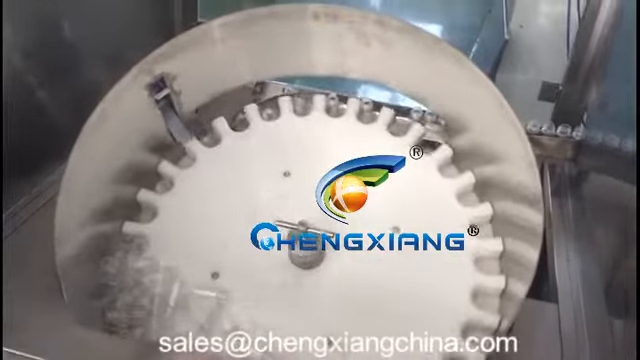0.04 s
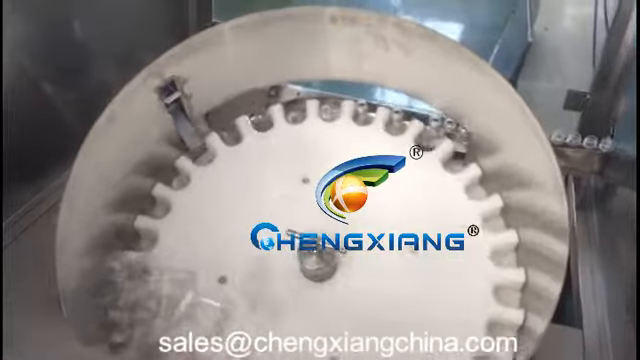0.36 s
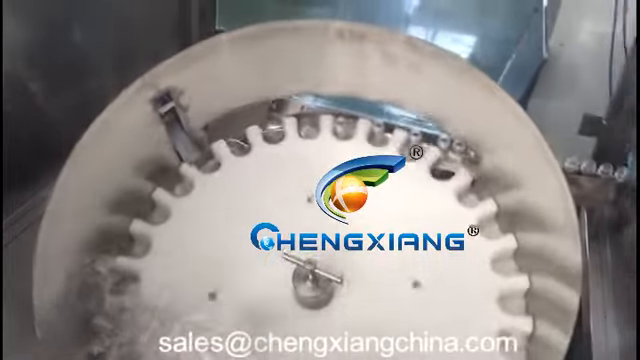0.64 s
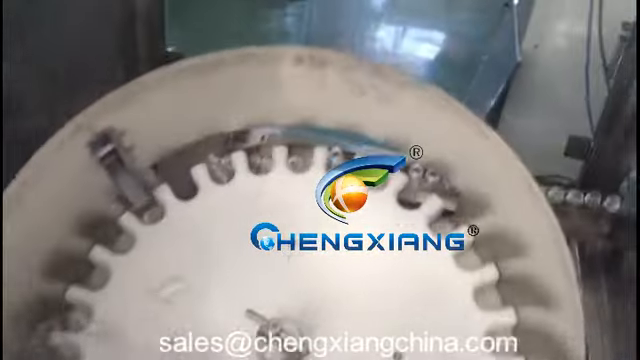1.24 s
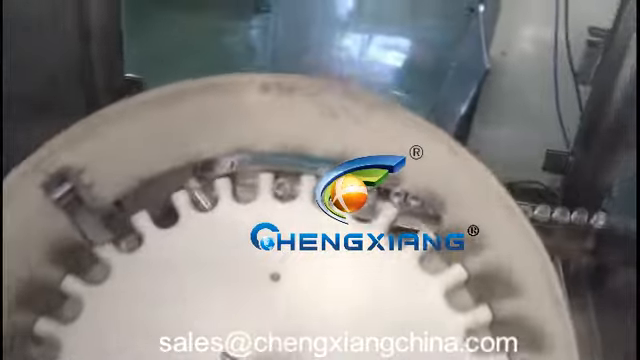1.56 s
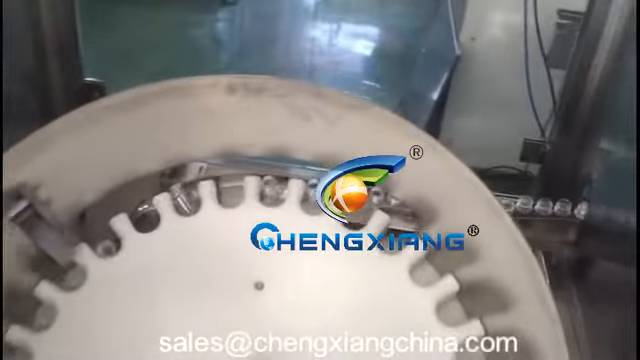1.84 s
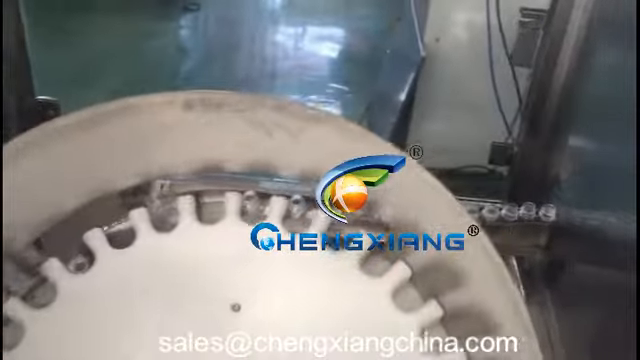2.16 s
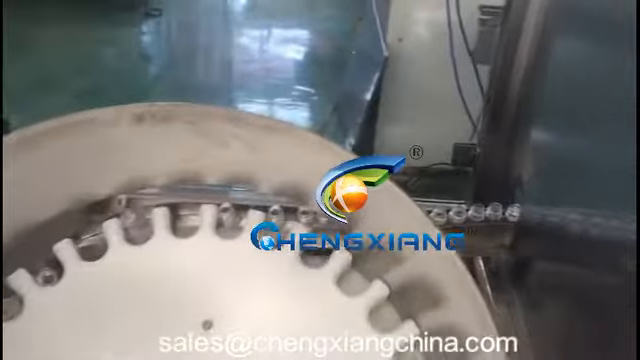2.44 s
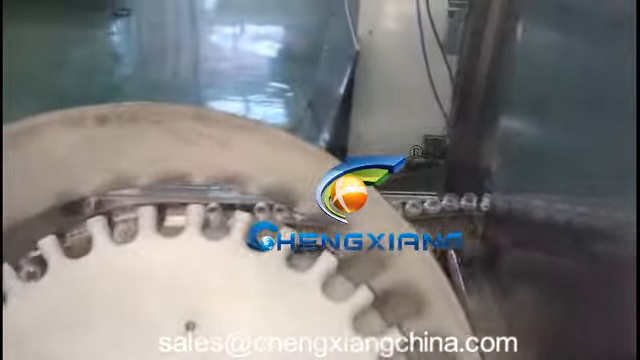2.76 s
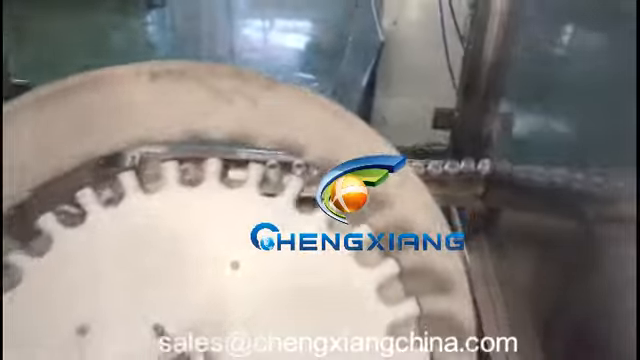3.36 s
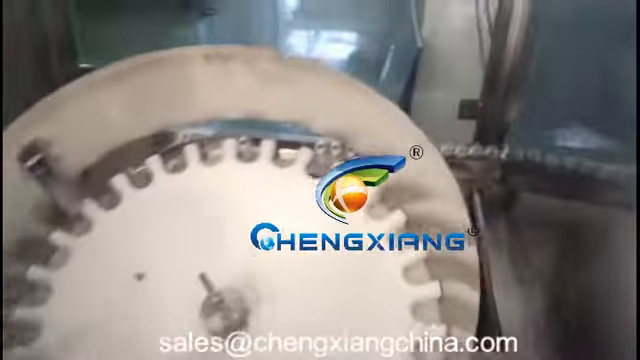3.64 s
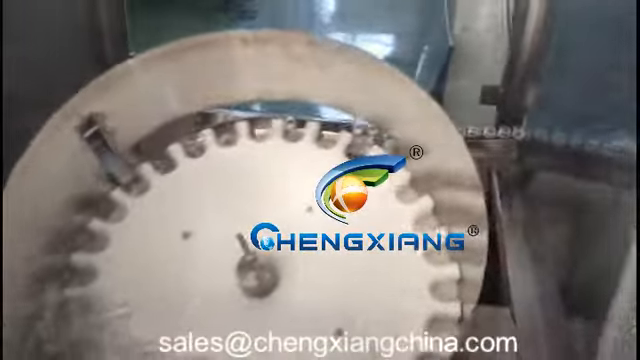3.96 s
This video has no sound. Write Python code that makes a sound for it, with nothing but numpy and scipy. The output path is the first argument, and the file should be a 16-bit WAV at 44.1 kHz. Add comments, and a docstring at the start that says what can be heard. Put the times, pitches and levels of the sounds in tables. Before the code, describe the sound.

A dense clatter of plastic bottles runs in a steel feeder bowl, dotted with knocks, rail clicks and a few tiny scrapes and squeaks. A hiss of compressed air rises and falls while machinery hums in the factory behind.

```python
"""A factory hall, at the feeder wheel of a bottling line. Small plastic bottles tumble in its steel bowl:
drops set the bowl ringing, thin walls tap together, the guide rail clicks and scrapes, necks hoot
hollowly and plastic squeaks on steel. Compressed air hisses, swelling about once a second, over a bed
of motor hum and machine din. A fast limiter holds the peaks."""
import sys
import numpy as np
from scipy import signal
from scipy.fft import rfft, irfft, next_fast_len
from scipy.io import wavfile
from scipy.ndimage import uniform_filter1d, minimum_filter1d, map_coordinates

SR = 44100
rng = np.random.default_rng(int(sys.argv[2]) if len(sys.argv) > 2 else 0)


def pcm_store(signal):
    """Save signal as 16-bit PCM."""
    levels = np.round(np.clip(np.atleast_2d(signal), -1, 1) * 32767)
    wavfile.write(sys.argv[1], SR, levels.astype(np.int16).T)


N = 176400

# bottles dropping against the bowl: start_s, level_db, clatter_s
DROPS = [(0.101, -17.5, 0.043), (.326, -16, 0.017), (.543, -16, 0.032), (0.564, -13.5, 0.017),
         (.638, -17.5, 0.006), (.808, -16, 0.049), (1.047, -10, 0.025), (1.094, -13, 0.014),
         (1.323, -13.5, 0.025), (1.438, -14, 0.013), (1.519, -23, 0.02), (1.569, -13.5, 0.0062),
         (1.680, -9, 0.011), (1.829, -10.5, 0.03), (1.961, -14.5, 0.02), (2.188, -10.5, 0.029),
         (2.392, -9, 0.023), (2.577, -19, .006), (2.766, -17, 0.027), (3.214, -10.5, 0.021),
         (3.355, -12.5, .02), (3.924, -17.5, .006), (3.962, -12, 0.018)]
# ringing modes of the bowl: pitch_hz, width_hz, level_db
BOWL_MODES = [(323, 120, -1.5), (626, 100, -3.5), (843, 34, 4), (1055, 65, 3.5), (1264, 117, 2),
              (1412, 79, 3.5), (1794, 36, 5), (1899, 69, 9), (2171, 224, 6.5)]
# tone of the clatter after a drop: frequency_hz, level_db
CLATTER_EQ = [(60, -43), (150, -36), (240, -11), (800, 7.5), (2200, 10.5), (2700, 4), (5000, -17),
              (12000, -13)]
# bottles tapping each other: start_s, level_db, pitch_hz
BOTTLE_TAPS = [(.096, -4, 1950), (.1335, 3, 2060), (.255, -6, 2090), (.293, -4.5, 2200), (.936, -1.5, 2100),
               (1.095, -5, 2150), (1.447, -5.5, 2130), (1.524, -7, 2170), (1.787, -9, 2110),
               (1.96, -6, 2060), (2.191, 4, 1920), (2.778, -5, 2160), (3.046, -9, 2000), (3.288, -10, 2100),
               (3.749, -5.5, 2110), (3.963, 5, 2200)]
# tone of a tap's crack: frequency_hz, level_db
TAP_EQ = [(100, -18), (800, -17), (1550, 0), (1950, -7), (2250, -8), (2700, -6), (5000, -27), (12000, -38)]
# bottles hitting the guide rail: start_s, level_db
RAIL_CLICKS = [(0.093, -19), (1.047, -27), (1.095, -23), (1.256, -14.5), (1.327, -22.5), (1.678, -22),
               (1.746, -22), (1.886, -21.5), (2.192, -16), (2.391, -14.5), (3.349, -14.5), (3.957, -19)]
# tone of a rail click: frequency_hz, level_db
CLICK_EQ = [(200, 6), (1500, -13.5), (3000, 12.5), (4100, 14.5), (5200, 12.5), (7000, 9.5), (9000, 1),
            (12000, -11)]
# how hard the heap tumbles: time_s, level_db
TUMBLE_FADER = [(0, -20.5), (.44, -20.5), (.5, -23), (.75, -21.5), (1.1, -24.5), (1.6, -20.5), (2.18, -23),
                (2.27, -49), (2.47, -25), (2.56, -32), (2.76, -21.5), (2.92, -23), (3.15, -28),
                (3.29, -22.5), (3.5, -25), (3.65, -20.5), (3.8, -23), (3.89, -26), (4, -21)]
# tone of the tumbling heap: frequency_hz, level_db
TUMBLE_EQ = [(80, -43), (160, -11.5), (240, 2), (520, 7.5), (820, 9), (950, 1), (1250, 6), (1550, 2),
             (1850, 8.5), (2150, 13), (2600, -1.5), (4000, -7), (12000, -14.5)]
# air sounding in a bottle's neck, and one low dull thud at 1.115 s: peak_s, level_db, pitch_hz, half_length_s
NECK_HOOTS = [(.440, -17, 785, 0.011), (.642, -13.5, 804, 0.0025), (1.115, -18.5, 438.4, 0.029),
              (1.134, -13, 864, 0.015), (2.138, -10, 850, 0.01), (2.978, -13, 866, 0.017),
              (3.748, -15, 836, 0.0099)]
# plastic squeaking on steel: peak_s, level_db, pitch_hz, half_length_s
PLASTIC_SQUEAKS = [(2.385, -8.5, 2130, 0.0052), (2.973, -15, 6550, .008), (3.193, -15, 6500, 0.0033)]
# bottles sliding along the rail: peak_s, level_db, half_length_s
RAIL_SCRAPES = [(.21, -18.5, 0.013), (.375, -15.5, 0.024), (3.7, -22.5, 0.011)]
# rail resonance under a scrape: pitch_hz, width_hz, level_db
RAIL_MODES = [(3750, 1100, 0)]
# strength of the air jet: time_s, level_db
JET_FADER = [(0, -22.5), (.28, -19), (.33, -16.5), (.41, -19.5), (.5, -20.5), (.85, -17), (1.17, -18.5),
             (1.35, -21), (1.66, -23), (2.02, -20), (2.12, -15), (2.185, -13.5), (2.25, -28.5), (2.35, -24),
             (2.56, -23.5), (3.04, -20.5), (3.14, -16), (3.195, -16.5), (3.27, -27), (3.41, -22),
             (3.5, -23), (3.7, -18), (3.89, -21.5), (4, -18.5)]
# tone of the jet: frequency_hz, level_db
JET_EQ = [(200, -16), (1200, 6.5), (2600, 6), (3700, 5.5), (4800, 3), (6400, 3), (7300, 0.5), (9400, 0.5),
          (10500, -4), (11300, 0), (12000, -28.5)]
# spurts of air past a bottle: peak_s, level_db, half_length_s
AIR_SPURTS = [(.35, -16, 0.02), (1.248, -14, 0.045), (1.413, -17, 0.011), (1.529, -21, 0.024),
              (2.973, -15, 0.0075)]
# tone of a spurt: frequency_hz, level_db
SPURT_EQ = [(1000, -15), (3000, 3), (3800, 3.5), (4800, 1), (6300, 6.5), (9300, 5), (10500, 0.5),
            (12000, -5.5)]
# resonances the air excites: pitch_hz, width_hz, level_db
WHISTLE_MODES = [(3770, 82, 1), (6400, 290, -8), (8430, 21, -13)]
# the motor's two hum tones: pitch_hz, level_db
HUM_TONES = [(50, -53.5), (100, -44)]
# slow swell of the upper hum tone: time_s, gain_db
HUM_FADER = [(0, -2), (.9, 6.5), (2.3, -9.5), (3.55, 4)]
# tone of the hall's din: frequency_hz, level_db
HALL_EQ = [(20, -44), (45, -11), (70, -12.5), (105, 1.5), (150, -15), (230, 1.5), (320, 3.5), (420, -5.5),
           (600, 2), (1500, -4.5), (3000, -29.5), (6000, -35), (11500, -15)]

CONTACTS_PER_S, HEAP_RINGS_PER_S = 120, 28
ROOM_T60_S = 0.18


def bottle_drops():
    """A dropped bottle strikes the bowl, then clatters on it for a moment."""
    body = amp(-0.5) * resonant_noise(BOWL_MODES) + noise(CLATTER_EQ)
    clatter = steadied(body, span_s=0.0051) * hit_envelope(DROPS, rise_s=0.00046, t60_s=0.1)
    return bowl_ring() + amp(-1) * clatter


def bowl_ring(gain_db=2.5, t60_s=0.09, scatter_db=4.5, detune=0.04):
    """Each drop sets bowl and bottle ringing; where it lands is chance, and so is the mix of modes."""
    out, t = np.zeros(N + SR), np.arange(SR // 4) / SR
    hz, _, mode_db = np.transpose(BOWL_MODES)
    for start_s, db, _ in DROPS:
        level_draw, pitch_draw = rng.standard_normal((2, len(hz)))
        cycles = np.outer(hz * (1 + detune * pitch_draw), t) + rng.random((len(hz), 1))
        tone = amp(mode_db + scatter_db * level_draw) @ np.sin(2 * np.pi * cycles)
        out[round(start_s * SR):][:len(t)] += amp(db + gain_db - 60 * t / t60_s) * unit(tone)
    return out[:N]


def bottle_taps():
    """Bottle on bottle: a short crack, and the thin wall rings briefly near 2 kHz."""
    hold_s = 0.0015
    hits = [(start_s, db, hold_s) for start_s, db, _ in BOTTLE_TAPS]
    crack = steadied(noise(TAP_EQ), span_s=0.0022) * hit_envelope(hits, rise_s=0.00049, t60_s=0.02)
    return amp(-7.5) * crack + amp(2) * wall_ring(BOTTLE_TAPS, t60_s=0.042)


def wall_ring(contacts, t60_s, rise_s=0.001):
    """A bottle's wall rings at each contact: two close modes that beat roughly."""
    out, t = np.zeros(N + SR), np.arange(SR // 6) / SR
    envelope = amp(-60 * t / t60_s) * (1 - np.exp(-t / rise_s))
    for start_s, db, hz in contacts:
        second_hz = hz * (1 + rng.uniform(-0.116, 0.1))
        tone = np.sin(2 * np.pi * hz * t) + amp(-8) * np.cos(2 * np.pi * second_hz * t)
        out[max(round(start_s * SR), 0):][:len(t)] += amp(db) * envelope * tone
    return out[:N]


def rail_clicks(hold_s=0.0062):
    """Bottles hit the guide rail with a hard, bright attack."""
    hits = [(start_s, db, hold_s) for start_s, db in RAIL_CLICKS]
    return amp(3.5) * noise(CLICK_EQ) * hit_envelope(hits, rise_s=0.00017, t60_s=0.046)


def tumbling_heap(spread_db=1.5, contact_t60_s=0.09, ring_hz=2154, detune=0.0994):
    """The heap rattles: many small contacts at random moments, with ringing walls among them."""
    contacts = rng.random(N) < CONTACTS_PER_S / SR
    strengths = contacts * amp(spread_db * np.clip(rng.standard_normal(N), -2, 2))
    decay = amp(-60 * clock()[:SR // 4] / contact_t60_s)
    power = signal.fftconvolve(strengths ** 2, decay ** 2)[:N]
    body = noise(TUMBLE_EQ) + amp(-7.5) * resonant_noise(BOWL_MODES)
    rattle = steadied(body * np.sqrt(np.abs(power)), span_s=0.27)
    pings = [((k + timing) / HEAP_RINGS_PER_S, 4 * level, ring_hz * (1 + detune * pitch))
             for k, (timing, level, pitch) in enumerate(rng.uniform(-1, 1, (400, 3)))]
    ring = wall_ring([ping for ping in pings if ping[0] < N / SR], t60_s=0.088)
    return amp(curve(TUMBLE_FADER)) * (rattle + amp(-2) * ring)


def neck_hoots():
    """The air in a bottle's neck sounds a hollow, grainy note; the one low row is a dull thud instead."""
    return wavering_tones(NECK_HOOTS, width_hz=55, rough_db=3.5)


def squeaks():
    """Plastic rubs on steel in tiny, high chirps."""
    return wavering_tones(PLASTIC_SQUEAKS, width_hz=305, rough_db=0)


def rail_scrapes():
    """Sliding plastic draws a bright rasp from the steel rail."""
    return swells(RAIL_SCRAPES) * resonant_noise(RAIL_MODES)


def compressed_air(flutter_db=1.14):
    """The jet that pushes the bottles along hisses, spurts past them and whistles faintly."""
    spurts = swells(AIR_SPURTS)
    jet = amp(curve(JET_FADER) + flutter_db * wobble(40))
    hiss = jet * shimmer(noise(JET_EQ), depth_db=3.5) + spurts * noise(SPURT_EQ)
    whistle = np.hypot(jet, spurts) * resonant_noise(WHISTLE_MODES)
    return hiss + amp(-16) * whistle


def motor_hum(drift_rad=0.23, waver_db=1.6):
    """The motor hums on two low tones; the upper one swells and wavers."""
    low, high = (amp(db) * np.sqrt(2) * np.sin(2 * np.pi * hz * clock() + drift_rad * wobble(5.4))
                 for hz, db in HUM_TONES)
    return low + amp(curve(HUM_FADER) + waver_db * wobble(19)) * high


def hall_din():
    """The other machines blur into a steady, dark bed."""
    return amp(-27.5) * noise(HALL_EQ)


def room(x, wet_db):
    """Nearby walls add a short, dense reverb at about the same overall power."""
    t = clock()[:SR // 2]
    tail = rng.standard_normal(len(t)) * amp(-60 * t / ROOM_T60_S) * (t > 0.002)
    wet = signal.fftconvolve(x, tail / np.linalg.norm(tail))[:N]
    return (x + amp(wet_db) * wet) / np.hypot(1, amp(wet_db))


def hit_envelope(hits, rise_s, t60_s):
    """Quick attack, hold and steady decay for each hit; overlaps add in power."""
    power, t = np.zeros(N + SR), np.arange(SR // 2) / SR
    attack = 1 - np.exp(-t / rise_s)
    for start_s, db, hold_s in hits:
        decay = amp(db - 60 * np.maximum(t - hold_s, 0) / t60_s)
        power[max(round(start_s * SR), 0):][:len(t)] += (attack * decay) ** 2
    return np.sqrt(power[:N])


def wavering_tones(notes, width_hz, rough_db):
    """Short tones that swell and fade; random phase drift smears each pitch over width_hz."""
    t, out = clock(), np.zeros(N)
    for peak_s, db, hz, half_s in notes:
        near = np.abs(t - peak_s) < 0.15
        drift = np.cumsum(rng.standard_normal(SR)[:near.sum()]) * np.sqrt(2 * np.pi * width_hz / SR)
        phase = 2 * np.pi * hz * t[near] + uniform_filter1d(drift, size=64)
        out[near] += amp(db) * np.sqrt(2) * np.sin(phase) / np.cosh((t[near] - peak_s) / half_s)
    return out * unit(amp(rough_db * wobble(220)))


def swells(rows):
    """An envelope of bell-shaped swells."""
    return sum(amp(db) / np.cosh(np.clip((clock() - peak_s) / half_s, -20, 20))
               for peak_s, db, half_s in rows)


def shimmer(x, depth_db):
    """Shifts the colour of x at random from moment to moment."""
    spectrum = signal.stft(x, nperseg=1024)[2]
    patches = uniform_filter1d(rng.standard_normal(spectrum.shape), size=7, axis=0)
    patches = uniform_filter1d(patches, size=5, axis=1)
    return unit(signal.istft(spectrum * amp(depth_db * unit(patches)), nperseg=1024)[1][:N])


def resonant_noise(modes):
    """Noise through resonances of alternating polarity, at rms 1."""
    def response(f):
        return sum((-1) ** k * amp(db) * 1j * f * width / (hz * hz - f * f + 1j * f * width)
                   for k, (hz, width, db) in enumerate(modes))
    return unit(filtered(rng.standard_normal(N), response))


def noise(eq):
    """Noise shaped by an EQ curve, at rms 1."""
    hz, db = np.transpose(eq)
    return unit(filtered(rng.standard_normal(N), lambda f: amp(np.interp(np.log(f + 1), np.log(hz), db))))


def filtered(x, response):
    """x through a frequency response."""
    size = next_fast_len(N + SR // 2)
    return irfft(rfft(x, size) * response(np.fft.rfftfreq(size, 1 / SR)), size)[:N]


def steadied(x, span_s):
    """Rides the level of x to rms 1 over span_s."""
    return x / np.sqrt(np.abs(uniform_filter1d(x * x, int(span_s * SR))) + 1e-6)


def wobble(rate_hz):
    """Smooth random modulation."""
    return map_coordinates(rng.standard_normal(4096), [clock() * rate_hz + 2], mode="wrap")


def curve(points):
    """A fader move: straight lines between timed points."""
    return np.interp(clock(), *np.transpose(points))


def clock():
    """Each sample's time in seconds."""
    return np.arange(N) / SR


def unit(x):
    """x scaled to rms 1."""
    return x / np.sqrt(np.mean(x ** 2) + 1e-20)


def amp(db):
    """Decibels to gain."""
    return 10 ** (np.asarray(db) / 20)


def scene():
    """The mono mix: bottle hits and notes in a short reverb; heap, scrapes, air and background dry."""
    notes = neck_hoots() + squeaks()
    bottles = room(bottle_drops() + rail_clicks() + notes, wet_db=-2.5) + room(bottle_taps(), wet_db=-9)
    return (bottles + tumbling_heap() + rail_scrapes() + compressed_air() + motor_hum() + hall_din())[None]


def record(dry, ceiling=0.92, hold_s=0.0009, cutoff_hz=11950):
    """A fast limiter holds the peaks, then a steep low-pass trims the top."""
    span = int(hold_s * SR)
    needed_gain = np.minimum(1, ceiling / (np.abs(dry[0]) + 1e-9))
    gain = uniform_filter1d(minimum_filter1d(needed_gain, span), span)
    return filtered(dry[0] * gain, lambda hz: 1 / np.sqrt(1 + (hz / cutoff_hz) ** 140))[None]


dry = scene()
out = record(dry)
pcm_store(out)
```